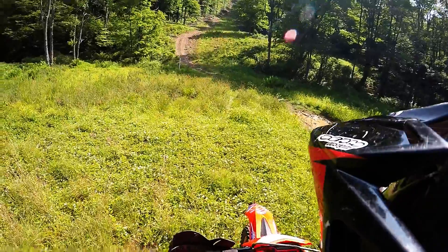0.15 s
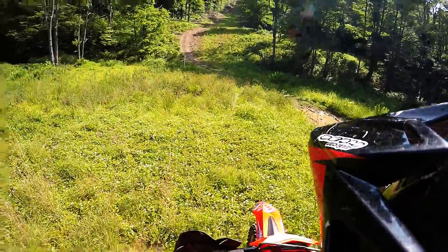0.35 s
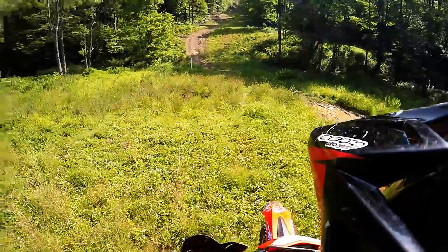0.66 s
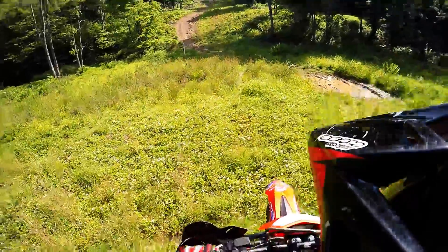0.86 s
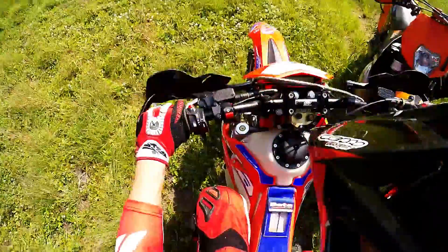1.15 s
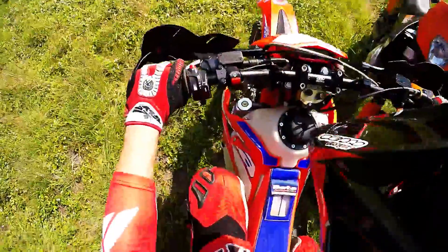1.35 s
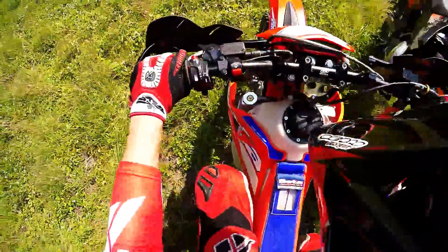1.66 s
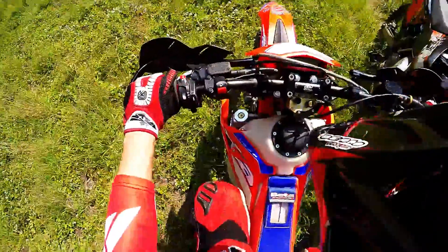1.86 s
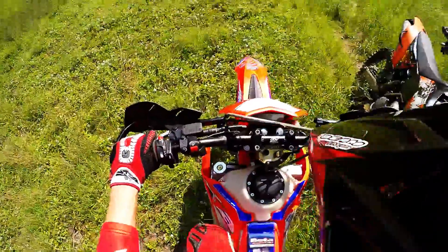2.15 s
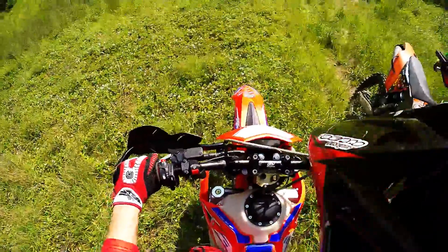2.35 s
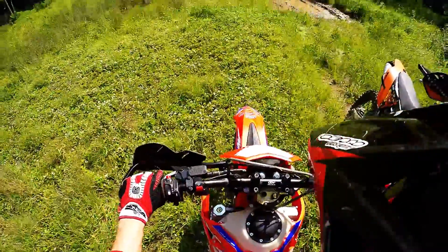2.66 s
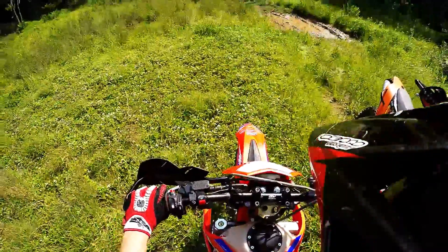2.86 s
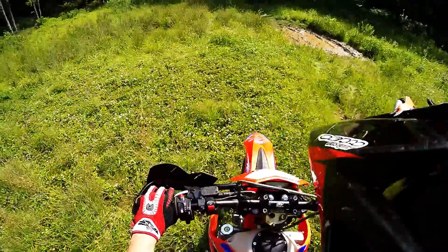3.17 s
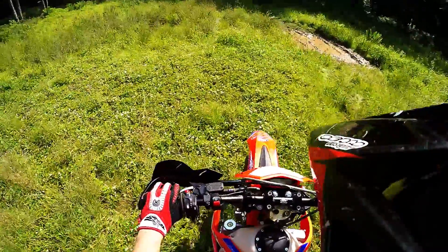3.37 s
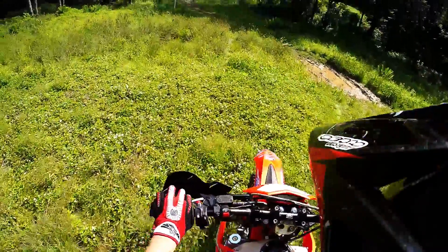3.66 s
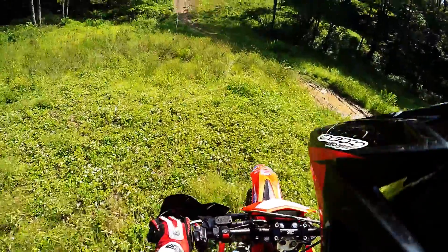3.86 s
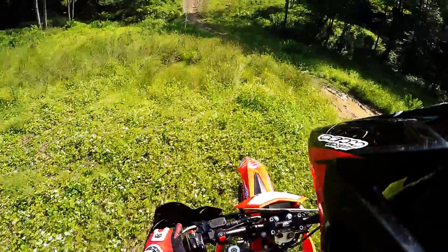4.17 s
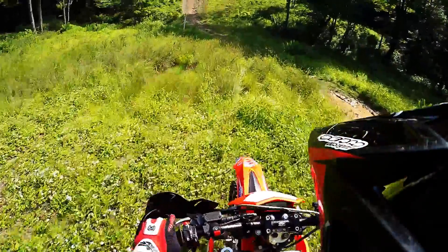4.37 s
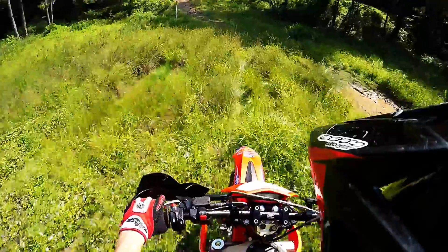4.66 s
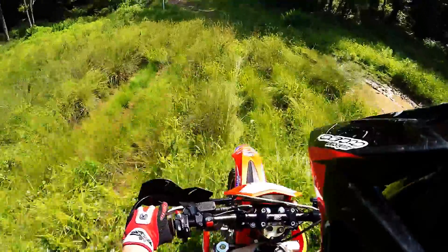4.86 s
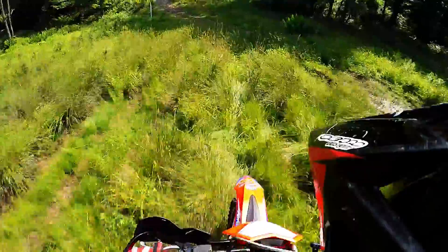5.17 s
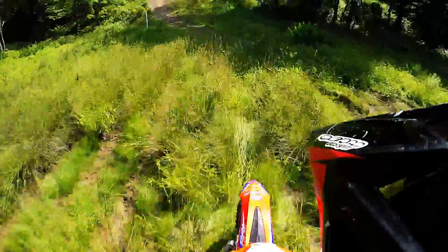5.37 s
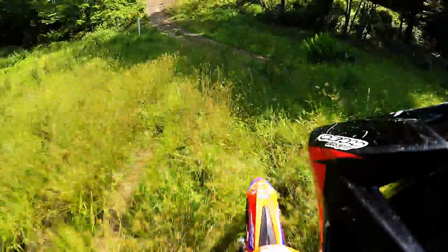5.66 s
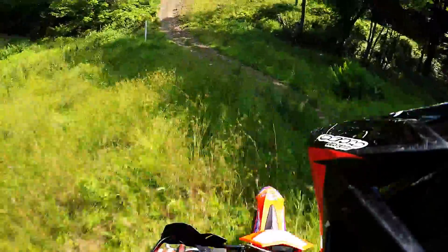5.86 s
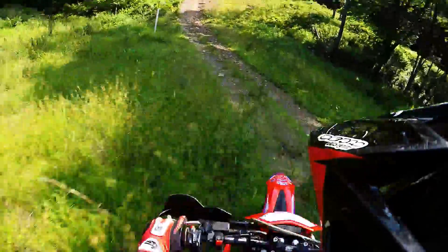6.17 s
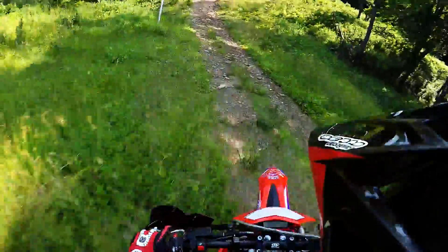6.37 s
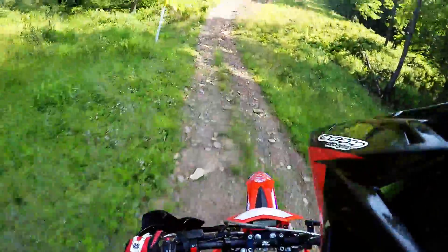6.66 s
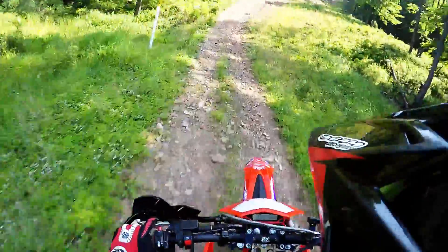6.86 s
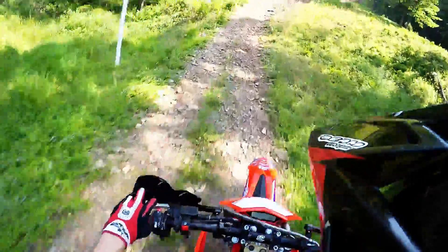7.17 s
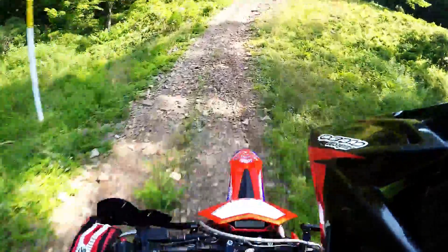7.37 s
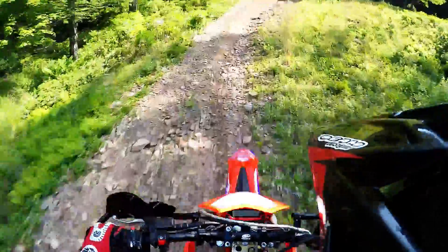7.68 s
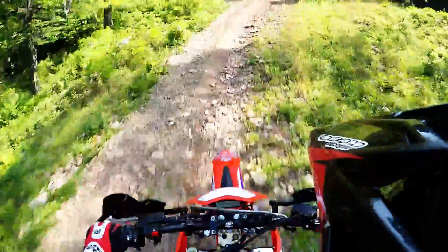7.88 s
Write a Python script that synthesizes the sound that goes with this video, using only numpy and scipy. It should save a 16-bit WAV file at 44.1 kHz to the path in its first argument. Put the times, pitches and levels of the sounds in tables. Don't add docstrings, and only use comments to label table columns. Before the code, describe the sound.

A starter grinds, a two-stroke dirt bike catches and idles with rattles, pulls away, stutters off throttle, then revs hard up a stony climb.

```python
import sys
import numpy as np
from scipy import signal
from scipy.fft import rfft, irfft, next_fast_len
from scipy.io import wavfile
from scipy.ndimage import uniform_filter1d

SR = 44100
rng = np.random.default_rng(int(sys.argv[2]) if len(sys.argv) > 2 else 0)


def magnitude_from_level(level_db):
    exponent = np.asarray(level_db, float) / 20
    return 10 ** exponent


def generate_wav(sig):
    pcm = np.round(np.clip(np.atleast_2d(sig).T, -1, 1) * 32767).astype(np.int16)
    wavfile.write(sys.argv[1], SR, pcm)


N = 353682
TIME_S = np.arange(N) / SR

# pitch in Hz, width in Hz, level in dB.
PIPE_MODES = [(236, 82, -9.5), (294, 18.6, 0.5), (528, 76, -5.5), (773, 39, -16), (1032, 60, -9.5)]
# pitch in Hz, width in Hz, level in dB.
SILENCER_MODES = [(1490, 63, 15.2), (1413, 52, 15.8), (2790, 26, 1)]
# pitch in Hz, width in Hz, level in dB.
COVER_MODES = [(470, 35, -5), (860, 160, -2.5), (1490, 82, -3.5), (2200, 48, 5.5), (3600, 79, 4),
               (7200, 120, -31)]
# pitch in Hz, width in Hz, level in dB.
CASING_MODES = [(1570, 560, -5.5), (2300, 340, -4), (2650, 142, 3), (3580, 167, 0), (3996, 127, -1.5),
                (4640, 53, -10), (4930, 36, -7.5), (6570, 620, -16.5)]
# frequency in Hz, level in dB per Hz.
HISS_SPECTRUM = [(150, 26), (400, 20), (1100, 5.5), (2600, 1.5), (3100, -5.5), (3700, -4.5), (6000, -13),
                 (9000, -19.5), (15500, -28.5)]
# time in seconds, level in dB, lean to its upper resonance in dB.
SILENCER_SINGING = [(3.1, 6, 0), (3.35, 5.5, -1), (3.5, 9, -12), (3.8, 7.5, -12), (4.05, 12.5, 0),
                    (4.15, 2, 2), (4.25, 7, -5), (4.45, 1, 1), (4.6, 4.5, -3), (5.1, -2, -1),
                    (5.6, -2.5, 3), (5.9, 4, 13), (6.5, 5, -2), (7.0, 2, 4), (7.4, -2.5, -4), (8.0, -3, 3)]
# time in seconds, peak level in dB.
LONE_FIRINGS = [(4.6264, -44), (4.664, -28), (4.735, -24.5), (4.779, -23), (4.8212, -24.5), (4.8666, -26),
                (4.9085, -26.5), (4.9683, -33), (5.0627, -24), (5.1067, -27), (5.149, -22.5)]

MID_SPEED, MID_THROTTLE_DB = 50, -28
CATCH_S, CATCH_RISE_S = 0.46, 0.33
PULL_AWAY_S = 3.08


def in_time(rows):
    s, *columns = np.transpose(rows)
    return [np.interp(TIME_S, s, column) for column in columns]


def ramp(from_s, rise_s):
    return np.clip((TIME_S - from_s) / rise_s, 0, 1)


def grains(spread_db, length):
    return magnitude_from_level(spread_db * rng.standard_normal(N // length + 1).repeat(length)[:N])


def wavering(per_s):
    count = 10 * per_s
    return np.interp(TIME_S, np.arange(count) / per_s, rng.standard_normal(count))


def evened(x, over_s):
    width = int(over_s * SR)
    power = uniform_filter1d(uniform_filter1d(x ** 2, width), width)
    return x / np.sqrt(power + 1e-12)


def cut(x, hz, kind, order=2):
    return signal.sosfilt(signal.butter(order, hz, kind, fs=SR, output="sos"), x)


def resonate(x, modes):
    out = 0
    for k, (hz, width_hz, db) in enumerate(modes):
        r = np.exp(-np.pi * width_hz / SR)
        a = [1, -2 * r * np.cos(2 * np.pi * hz / SR), r * r]
        ringing = signal.lfilter([1 - r * r, 0, r * r - 1], a, x + 1e-18)
        out = out + (-1) ** k * magnitude_from_level(db) * ringing
    return out


def patchy(x, modes):
    gains = magnitude_from_level(2.5 * rng.standard_normal((len(modes), 100)))
    out = 0
    for k, mode in enumerate(modes):
        gain = np.interp(TIME_S * 12, np.arange(100), gains[k])
        out = out + (-1) ** k * gain * resonate(x, [mode])
    return out


def coloured(spectrum):
    hz, db = np.transpose(spectrum)
    size = next_fast_len(N, real=True)
    bins = np.log(np.arange(1, size // 2 + 2) * SR / size)
    gain = magnitude_from_level(np.interp(bins, np.log(hz), db))
    x = irfft(rfft(rng.standard_normal(size)) * gain, size)[:N]
    return x / x.std()


def struck(rows):
    clicks = np.zeros(N)
    clicks[[round(s * SR) for s, db in rows]] = magnitude_from_level(np.array(rows)[:, 1])
    return clicks


def firings(turns, jitter_s, uneven_db):
    at = np.flatnonzero(np.diff(np.floor(turns)))
    chance = rng.standard_normal((len(at), 2))
    moved = np.clip(at + (jitter_s * SR * chance[:, 0]).astype(int), 0, N - 1)
    clicks = np.zeros(N)
    clicks[moved] = magnitude_from_level(uneven_db * chance[:, 1])
    return clicks


def stillness():
    # frequency in Hz, level in dB per Hz.
    still_spectrum = [(300, 3), (700, 4), (893, 2), (1110, -1), (1900, -1), (2160, 2), (3500, -0.5),
                      (5590, -5), (15000, -16)]
    return magnitude_from_level(-65) * cut(coloured(still_spectrum), 250, "high")


def crank():
    # time in seconds, speed in turns per second.
    speed_curve = [(1.85, 38.5), (2.25, 30), (2.85, 27), (3.0, 39.8), (3.28, 47.2), (3.71, 48.7),
                   (4.45, 57.3), (4.8, 42.6), (5.1, 41.5), (5.27, 59.4), (5.95, 92.5), (6.15, 70.3),
                   (6.34, 67), (7.05, 94), (7.32, 133), (7.43, 127.5), (7.67, 91.1), (8.01, 115.9)]
    # time in seconds, change in turns per second, length in seconds.
    snatches = [(4.25, -3.9, .26), (4.6, 3.8, .34), (5.17, 2.2, .16), (5.495, -6.2, .14), (5.62, -4, .11),
                (5.84, -6, .18), (6.02, 2.5, .12), (6.24, 2.2, .18), (6.5, 5.8, .18), (6.7, -2.2, .2),
                (6.83, 2.4, .14), (7.15, -5.6, .18), (7.5, -2.5, .14), (7.62, 3.2, .1), (7.79, 6, .16),
                (7.89, -6.7, .22)]
    per_s, = in_time(speed_curve)
    for s, change, lasting_s in snatches:
        i, half = round(s * SR), round(lasting_s * SR / 2)
        per_s[i - half:i + half + 1] += change * np.bartlett(2 * half + 1)[:N - i + half]
    return per_s


def shaking(turns, per_s):
    # time in seconds, level in dB.
    shake_level = [(0, -50), (.46, -49), (.5, -33.5), (.94, -39), (1.03, -29), (1.92, -40), (2.68, -40.5),
                   (3.19, -33), (3.4, -42), (4.15, -35.5), (5.0, -30.5), (5.16, -35.5), (5.78, -26),
                   (5.9, -35.5), (6.1, -32), (6.99, -33.5), (7.24, -24.5), (8.02, -23)]
    # pitch in Hz, width in Hz, level in dB.
    mount_modes = [(26.4, 14.2, -1.5), (43.6, 11.2, -8), (69.2, 16, -9.5)]
    db, = in_time(shake_level)
    crank_share = np.clip(0.61 * np.clip(1.9 - per_s / 60, .05, 1), 0, 1)
    rumble = cut(resonate(rng.standard_normal(N), mount_modes), 128, "low")
    vibration = np.sqrt(2 * crank_share) * np.sin(2 * np.pi * turns)
    return magnitude_from_level(db) * (vibration + np.sqrt(1 - crank_share) * rumble / rumble.std())


def metal_rattle():
    body = resonate(rng.standard_normal(N), COVER_MODES + CASING_MODES)
    bright = cut(coloured(HISS_SPECTRUM), 1600, "high")
    return (body / body.std() + 3.6 * bright) * grains(2.5, 100)


def knocks(rattle):
    # time in seconds, peak level in dB, fall by 60 dB in seconds.
    starter_teeth = [
        (0.256, -31, 0.23),
        (0.275, -33, 0.036),
        (0.296, -25, 0.066),
        (0.308, -23, 0.083),
        (0.387, -30, 0.041),
        (0.412, -22, 0.022),
        (0.43, -22.5, 0.025),
    ]
    # time in seconds, peak level in dB, pitch in Hz, fall by 60 dB in seconds, ringing part in dB.
    knock_events = [(0.229, -39, 2200, 0.42, -18), (0.448, -23, 1566, 0.079, -4),
                    (0.517, -37, 1450, 0.045, -3), (0.598, -24.5, 2200, 0.12, -16),
                    (0.989, -27, 3600, 0.089, -7), (0.999, -24, 2150, 0.049, -8),
                    (1.039, -30, 3600, .06, 2), (1.049, -20.5, 1445, 0.15, -1.5),
                    (1.114, -13, 2140, 0.084, -13), (1.118, -29, 860, 0.036, 0),
                    (1.159, -24.5, 2275, 0.39, -17), (1.234, -27.5, 2180, 0.062, -2),
                    (1.269, -25.5, 3730, 0.13, 1), (1.319, -31.5, 2720, 0.19, -3),
                    (1.415, -21, 875, 0.036, -16), (1.503, -34, 3600, 0.1, -3),
                    (1.549, -34, 1490, 0.082, 0), (1.599, -31, 3640, 0.071, -0.5),
                    (1.703, -30.5, 2130, 0.03, -1), (1.759, -24.5, 2200, 0.1, -1),
                    (1.799, -34, 3450, 0.17, -8), (2.098, -32, 895, 0.45, -16),
                    (2.19, -32, 2200, 0.044, -4), (2.294, -31, 3430, 0.055, -5),
                    (2.396, -18.5, 3670, 0.048, -9.5), (2.57, -32, 2300, 0.095, -8),
                    (2.855, -30, 3550, 0.058, -7), (2.982, -27, 1050, 0.22, -10),
                    (3.169, -42, 1470, 0.09, -7), (6.221, -30, 1010, 0.27, -11),
                    (6.405, -22, 800, 0.05, -11), (6.408, -29, 474, .04, -5), (7.644, -5.5, 880, 0.13, -17),
                    (7.79, -9, 3520, 0.24, -6.5), (7.85, -12.5, 2520, 0.1, -6), (7.885, -17, 2200, .06, 0),
                    (7.935, -6.5, 2510, 0.22, -10)]
    starter_hz, starter_tone_db, rise_s, tone_t60_s = 3550, -4.0, 0.0013, 0.06
    teeth = [(s, db, starter_hz, t60, starter_tone_db) for s, db, t60 in starter_teeth]
    out = np.zeros(N)
    for s, db, hz, t60, tone_db in teeth + knock_events:
        i = round(s * SR)
        t = np.arange(min(N - i, int(t60 * SR) + 1)) / SR
        tone = magnitude_from_level(tone_db) * np.sin(2 * np.pi * hz * t) * magnitude_from_level(-60 * t / tone_t60_s)
        burst = 0.18 * rattle[i:i + len(t)] * magnitude_from_level(-60 * t / t60)
        out[i:i + len(t)] += magnitude_from_level(db) * np.minimum(t / rise_s, 1) * (tone + burst)
    return out


def grinding(rattle):
    # start in seconds, end in seconds, level in dB.
    grinds = [
        (0.249, 0.282, -47),
        (.294, 0.331, -48),
        (0.377, 0.396, -47),
        (0.416, 0.47, -47),
    ]
    gain = sum(magnitude_from_level(db) * (ramp(start, 0.0055) - ramp(end, .006)) for start, end, db in grinds)
    return gain * rattle


def puffs():
    # time in seconds, peak level in dB, decay time in seconds.
    gusts = [(.255, -39, 0.18), (.295, -43.5, 0.32), (0.382, -44, 0.11), (0.428, -45.5, 0.63),
             (.535, -51.5, 1.49), (.95, -65, 4.5), (1.265, -38, 0.3), (1.5, -44.5, 0.51),
             (1.762, -39, 0.31), (2.295, -50, 0.26), (2.394, -35, 0.073), (2.57, -49.5, 0.28),
             (2.856, -51, 0.16), (2.983, -44, 0.26), (3.16, -55, 1.1), (5.9, -60, 0.44), (6.722, -45, 1.3),
             (7.495, -18, 0.059), (7.644, -29, 0.062)]
    gain = np.zeros(N)
    for s, db, t60 in gusts:
        i = round(s * SR)
        t = np.arange(min(N - i, int(t60 * SR / 2) + 1)) / SR
        gain[i:i + len(t)] += np.minimum(t / 0.015, 1) * magnitude_from_level(db - 106 * (t / t60) ** 1.45)
    return gain


def spits():
    # time in seconds, peak level in dB.
    spit_events = [(0.2558, -37), (0.2932, -42), (0.3845, -33.5), (0.415, -37), (0.428, -30),
                   (0.4978, -41.5), (0.5362, -36), (0.5965, -34), (0.7244, -34), (0.8076, -37),
                   (0.8644, -40), (0.9233, -39), (0.9857, -35), (1.0365, -33), (1.1109, -37), (1.158, -36),
                   (1.2321, -39), (1.27, -30), (1.4132, -50), (1.4716, -54), (1.511, -29), (1.5998, -33.5),
                   (1.7639, -31), (2.0956, -46), (2.3004, -32), (2.5735, -38), (2.8614, -36), (2.9906, -35),
                   (3.0294, -39), (3.1702, -44), (4.7331, -36), (4.775, -36), (4.965, -35.5), (5.0596, -37),
                   (5.1432, -36), (6.2163, -32), (7.65, -13.5)]
    t60_s, low_edge_hz = 0.15, 4460
    dying = signal.lfilter([1], [1, -magnitude_from_level(-60 / (t60_s * SR))], struck(spit_events) + 1e-18)
    bright = cut(coloured(HISS_SPECTRUM), low_edge_hz, "high")
    return magnitude_from_level(-9) * dying * grains(3, 90) * bright / bright.std()


def blips():
    # start in seconds, end in seconds, level in dB.
    bursts = [
        (0.385, 0.402, -41),
        (0.483, 0.614, -37.5),
        (0.957, 1.075, -36.5),
        (1.19, 1.31, -38),
        (1.48, 1.557, -33.5),
        (1.717, 1.807, -33.5),
        (2.92, 3.031, -35),
        (6.158, 6.233, -41),
        (6.417, 6.42, -43),
        (6.59, 6.58, -41),
    ]
    gain, edge = np.zeros(N), int(.018 * SR)
    for start, end, db in bursts:
        gain += magnitude_from_level(db) * (TIME_S > start) * (TIME_S < end)
    return np.maximum(uniform_filter1d(uniform_filter1d(gain, edge), edge), 0)


def squeal():
    # start in seconds, end in seconds, first pitch in Hz, last pitch in Hz, level in dB.
    whistle = (.438, .464, 3450, 2600, -29)
    # multiple of the pitch, level in dB.
    partials = [(0.499, -5), (1.001, -1.5), (1.7, -11), (2.1, -11), (2.5, -10)]
    start, end, from_hz, to_hz, db = whistle
    gone = np.clip((TIME_S - start) / (end - start), 0, 1)
    cycles = np.cumsum(from_hz + (to_hz - from_hz) * gone) / SR
    tone = sum(magnitude_from_level(part_db) * np.sin(2 * np.pi * k * cycles) for k, part_db in partials)
    return grains(3, 60) * magnitude_from_level(db) * np.sin(np.pi * gone) * tone


def levels(per_s):
    # time in seconds, level in dB.
    throttle = [(3.08, -66), (3.17, -30), (4.56, -27), (5.07, -25), (5.63, -22), (5.69, -24), (5.95, -27),
                (5.98, -37.5), (6.29, -41), (6.35, -35), (6.76, -30.5), (7.1, -21.5), (7.33, -17.5),
                (7.46, -18.5), (7.49, -32.5), (7.56, -30.5), (7.595, -19.5), (8.02, -16.5)]
    # start in seconds, end in seconds, change in dB.
    blares = [
        (5.4, 5.93, -0.5),
        (6.1, 6.357, 0),
        (7.16, 7.464, 0.5),
        (7.522, 7.635, -5.5),
    ]
    idle_load_db, gas_builds_s = -8, 0.042
    octaves = np.log2(per_s / MID_SPEED)
    turning = ramp(CATCH_S, CATCH_RISE_S) ** 2
    stony = ramp(6.765, 0.43)
    throttle_db, = in_time(throttle)
    boom = magnitude_from_level(throttle_db) * turning + blips()
    sings_db = in_time(SILENCER_SINGING)[0]
    ring_db = -35.5 + 3.5 * octaves + 1.65 * wavering(20) + sings_db
    ring = magnitude_from_level(ring_db) * boom / magnitude_from_level(MID_THROTTLE_DB)
    load_db = np.where(TIME_S > PULL_AWAY_S, throttle_db - MID_THROTTLE_DB, idle_load_db)
    late_db = np.minimum(load_db, np.interp(TIME_S - gas_builds_s, TIME_S, load_db))
    clatter_db = -42.5 + 11.5 * octaves + 0.081 * load_db + 2.5 * stony
    gas_db = -47.5 + 9 * octaves + 0.33 * late_db + 8 * stony + 1.6 * wavering(30)
    gas_db += sum(db * (ramp(a, .02) - ramp(b, .01)) for a, b, db in blares)
    return boom, ring, magnitude_from_level(clatter_db) * turning, magnitude_from_level(gas_db) * turning + puffs()


def skipping():
    # start in seconds, end in seconds.
    skipping_span = (4.615, 5.165)
    start, end = skipping_span
    lone_s = np.array(LONE_FIRINGS)[:, 0]
    since = TIME_S - lone_s[np.maximum(np.searchsorted(lone_s, TIME_S) - 1, 0)]
    dying = magnitude_from_level(-4.5 - 108 * abs(since))
    return np.where((TIME_S > start) & (TIME_S < end), dying, 1)


def unsteady(per_s):
    # start in seconds, end in seconds, noise between the lines from 0 to 1.
    spells = [
        (0, 3.22, .32),
        (4.62, 5.22, .35),
        (5.96, 6.78, .52),
    ]
    steady = .07
    noise = steady
    for start, end, share in spells:
        noise = noise + (share - steady) * (ramp(start - .05, .1) - ramp(end - .05, .1))
    wander_db = .8 + 5 * noise + 2.5 * np.maximum(np.log2(per_s / MID_SPEED), 0)
    return noise, wander_db


def exhaust(turns, per_s):
    # frequency in Hz, level in dB.
    order_strength = [(60, -14), (150, -23.5), (180, -13), (200, -13), (250, 0), (292, -3), (350, -25),
                      (400, -19.5), (465, -11), (530, -18.5), (620, -23), (750, -20.5), (1000, -26),
                      (1200, -31), (1700, -33)]
    # time in seconds, pitch of the pipe relative to cool gas,
    # evenness of the upper orders up to 1, lift of the second resonance in dB, of the outer orders in dB.
    gas_heat = [(3.0, 1.01, -.3, -10, -4), (3.3, 0.99, 0, 1, 5), (4.5, 1.023, -.2, 1.5, -1.5),
                (5.0, 1.025, -0.45, -21, 6), (5.3, 1, .2, 5, -3.5), (5.55, 1.12, .3, -1.5, 2),
                (5.72, 1.1, .3, 14.5, 14.5), (5.95, 1.17, .3, 9.5, 11), (6.0, 1.1, .2, 15, 15),
                (6.2, 0.96, -.3, -2, 16), (6.5, 1.015, .4, 10, 11), (6.68, 1.06, .3, 5, 4),
                (6.85, 1.123, .9, 14, 9), (7.1, 1.04, .5, -5.5, 7), (7.4, 1.045, 0.5, 2, -5),
                (7.7, 1.1, 0.5, 1.5, 1), (7.85, 1.17, .3, -20, -3), (8.0, 1.08, .6, -3, -14.5)]
    coarse = np.arange(0, N, 64)
    hot, even, second_db, lift_db = [column[::64] for column in in_time(gas_heat)]
    noise_share, wander_db = unsteady(per_s)
    hz, db = np.transpose(order_strength)
    order = np.arange(2, 26)[:, None]
    cold_hz = order * per_s[::64] / hot
    level_db = np.interp(np.log(cold_hz), np.log(hz), db)
    levelled_db = -14 - 3 * (cold_hz / 1000) ** 2
    level_db += (cold_hz > 330) * even * (levelled_db - level_db)
    level_db += lift_db * ((cold_hz < 170) + .6 * (cold_hz > 760))
    level_db += second_db * np.exp(-((cold_hz - 497) / 62) ** 2)
    level_db += -13.5 * (cold_hz < 215) * np.exp(-((coarse / SR - 5.58) / 0.16) ** 2)
    wander = uniform_filter1d(rng.standard_normal(level_db.shape), 50) * 7
    wander = np.minimum(wander, 1) * np.minimum(order / 8, 1)
    gains = magnitude_from_level(level_db + wander_db[::64] * wander)
    gains = gains / np.sqrt(np.sum(gains ** 2, axis=0) / 2)
    wobble = np.interp(turns, np.arange(700), rng.standard_normal(700))
    phase = 2 * np.pi * (turns + .003 * np.maximum(per_s / 60, 1) * wobble)
    lags = .2 * order * rng.standard_normal(order.shape)
    lines = 0
    for k, gain, lag in zip(order, gains, lags):
        lines = lines + np.interp(np.arange(N), coarse, gain) * np.cos(k * phase + lag)
    blur = resonate(rng.standard_normal(N), PIPE_MODES)
    uneven = magnitude_from_level(9 * noise_share * np.roll(wobble, N // 2))
    return lines * uneven + noise_share * blur / blur.std()


def silencer(turns):
    late = np.roll(firings(turns, jitter_s=.00005, uneven_db=1.5), int(.003 * SR))
    puff = cut(late, 200, "low", order=1) * rng.standard_normal(N) * 2.5
    soft = resonate(late, [(1430, 450, 0), (2620, 500, -2)])
    drive = soft + 0.25 * puff
    lean = magnitude_from_level(in_time(SILENCER_SINGING)[1])
    ring = lean * resonate(drive, SILENCER_MODES[:1]) - resonate(drive, SILENCER_MODES[1:]) / lean
    return magnitude_from_level(-8.5) * evened(ring, 0.13)


def casing_clatter(swell, per_s):
    grit = swell * rng.standard_normal(N) * grains(1.25, 64)
    drum_db = 7 - .25 * (per_s - 35) - 5 * ramp(PULL_AWAY_S, .1)
    drumming = magnitude_from_level(drum_db) * resonate(swell ** .5 * grit, COVER_MODES)
    clatter = cut(patchy(grit, CASING_MODES) + drumming, 7700, "low", order=6)
    return magnitude_from_level(1.0) * evened(clatter, 0.1)


def gas_hiss(swell, per_s):
    # pitch in Hz, width in Hz, level in dB.
    fin_modes = [(3430, 60, -6), (3687, 115, -5), (4017, 40, -9), (5030, 90, -13), (5340, 60, -16),
                 (6300, 500, -19), (7200, 350, -15)]
    # pitch in Hz, width in Hz, level in dB.
    rasp_modes = [(5540, 1100, -3), (2930, 1200, -19)]
    octaves = np.log2(per_s / MID_SPEED)
    gas = cut(coloured(HISS_SPECTRUM), 1500, "high")
    gas = gas + 3.0 * magnitude_from_level(4.0 * octaves) * patchy(gas, fin_modes)
    gas = gas + magnitude_from_level(-22 + 23.5 * octaves) * resonate(gas, rasp_modes)
    crackle = grains(1.6, 150)
    return magnitude_from_level(4.5) * evened(crackle * swell ** 0.019 * gas, 0.016)


def engine(turns, per_s):
    boom_gain, ring_gain, clatter_gain, gas_gain = levels(per_s)
    firing = skipping()
    depth_db = np.clip(17 - .27 * per_s, 1, 20)
    swell = magnitude_from_level(depth_db * np.cos(2 * np.pi * turns))
    boom = exhaust(turns, per_s) * boom_gain
    ring = silencer(turns) * ring_gain
    clatter = casing_clatter(swell, per_s) * clatter_gain
    hiss = gas_hiss(swell, per_s) * gas_gain
    intake = firing ** 0.24 * ramp(PULL_AWAY_S, 0.069) * magnitude_from_level(2.5) * cut(hiss, 7960, "high")
    flow = np.minimum(2 * firing, 1) ** 1.6
    return firing ** 1.6 * boom + firing * ring + firing ** 0.02 * clatter + flow * (hiss + intake)


def idling(turns):
    # pitch in Hz, width in Hz, level in dB.
    piston_modes = [(253, 70, -7), (800, 120, 0), (980, 140, 0)]
    clicks = firings(turns, jitter_s=.0003, uneven_db=1.2)
    slap = resonate(cut(clicks + 1e-18, 1500, "low"), piston_modes)
    idle = ramp(CATCH_S, CATCH_RISE_S) - ramp(PULL_AWAY_S, 0.15)
    return magnitude_from_level(-48.5) * idle * slap / slap.std()


def rattling():
    # start in seconds, end in seconds, level in dB.
    rattles = [
        (.5, 0.922, -55.5),
        (0.963, 1.133, -43),
        (1.143, 1.248, -40),
        (1.277, 1.36, -43),
        (1.51, 1.646, -48),
        (1.757, 1.84, -44),
        (7.2, 7.458, -36),
        (7.757, 8.02, -30.5),
    ]
    # pitch in Hz, width in Hz, level in dB.
    chain_modes = [(3600, 110, 5), (3900, 160, -5.5), (5040, 170, -13), (7030, 250, -14)]
    hits_per_s = 900
    hits = (rng.random(N) < hits_per_s / SR) * rng.standard_normal(N) * magnitude_from_level(3 * rng.standard_normal(N))
    chain = patchy(hits, chain_modes)
    gain = sum(magnitude_from_level(db) * (ramp(a, .008) - ramp(b, .02)) for a, b, db in rattles)
    return gain * chain / chain.std()


def jolts():
    # time in seconds, peak level in dB, pitch in Hz, direction as a sign.
    jolt_events = [(.646, -27, 33, -1), (1.037, -24, 29.95, -1), (1.151, -20, 26, 1),
                   (1.172, -27, 28.2, -1), (1.268, -25, 28.2, -1), (1.075, -24, 70, 1), (1.5, -28, 65, 1),
                   (1.531, -28, 64.6, -1), (1.76, -27, 65, 1), (4.113, -26, 28, -1), (4.679, -24, 28, -1),
                   (4.722, -19, 32, -1), (4.874, -29, 28, -1), (4.97, -20, 30, 1), (4.984, -16.5, 30.4, -1),
                   (5.698, -21, 28, -1), (5.745, -9.5, 27.6, 1), (6.728, -22, 33, -1), (6.762, -23, 32, -1),
                   (6.817, -17.5, 28, 1), (7.16, -17, 29.8, -1), (7.455, -19, 28, -1), (7.576, -15, 28, -1),
                   (7.626, -8, 33, -1), (7.643, -8, 32.4, 1), (7.912, -31, 30, -1), (7.966, -18, 30, -1)]
    out = np.zeros(N)
    for s, db, hz, way in jolt_events:
        near = np.arange(round(s * SR) - 1500, min(round(s * SR) + 3500, N))
        cycles = (near / SR - s) * hz - .6
        out[near] += way * magnitude_from_level(db) * np.cos(2 * np.pi * cycles) * np.exp(-(cycles / 0.35) ** 2)
    return out


def coughs():
    # time in seconds, peak level in dB.
    cough_events = [(.94, -32), (1.0, -30), (1.049, -28), (1.081, -34), (2.271, -54), (2.3, -39),
                    (2.471, -47), (2.505, -46), (2.546, -44), (2.579, -43), (2.752, -43), (2.786, -46),
                    (2.829, -47), (2.864, -42), (6.216, -24), (6.297, -29), (6.36, -23.5), (6.404, -19.5),
                    (6.445, -23), (6.535, -25), (6.575, -22), (6.729, -26)]
    # pitch in Hz, width in Hz, level in dB.
    cough_modes = [(245, 35, 3.5), (504, 200, -10.5), (800, 250, -3.5)]
    return 46.0 * resonate(cut(struck(cough_events) + 1e-18, 1200, "low"), cough_modes)


def ticks():
    # time in seconds, peak level in dB.
    tick_events = [
        (0.94, -17),
        (1, -21),
        (1.081, -13),
        (5.741, 2),
        (6.079, -9.5),
        (6.731, -9),
        (7.653, -20),
    ]
    dull = cut(struck(tick_events) + 1e-18, 2600, "low", order=12)
    return 8.0 * cut(dull, 600, "high")


def lone_firings():
    clicks = struck(LONE_FIRINGS)
    dull = cut(clicks + 1e-18, 1900, "low", order=4)
    dying = signal.lfilter([1], [1, -magnitude_from_level(-60 / (.15 * SR))], clicks)
    gust = cut(dying, 55, "low", order=1) * coloured(HISS_SPECTRUM)
    return 55 * resonate(dull, PIPE_MODES) + magnitude_from_level(20.5) * resonate(dull, SILENCER_MODES) + 0.35 * gust


def scene():
    per_s = crank()
    turns = np.cumsum(per_s) / SR
    rattle = metal_rattle()
    mono = stillness() + shaking(turns, per_s) + jolts()
    mono += knocks(rattle) + grinding(rattle) + spits() + squeal()
    mono += engine(turns, per_s) + idling(turns) + rattling()
    mono += coughs() + ticks() + lone_firings()
    return np.array([mono, mono])


def top_cut(x):
    return signal.sosfilt(signal.butter(12, 15300, fs=SR, output="sos"), x)


def record(dry):
    flutter = cut(rng.standard_normal(N), 100, "low")
    bright = dry[0] + 1.5 * cut(dry[0], 2500, "high", order=1)
    side = magnitude_from_level(-27.5) * bright * flutter / flutter.std()
    soft = 0.93 * np.tanh((dry + side * [[1], [-1]]) / 0.85)
    return top_cut(cut(soft, 15600, "low", order=16))


dry = scene()
out = record(dry)
generate_wav(out)
```